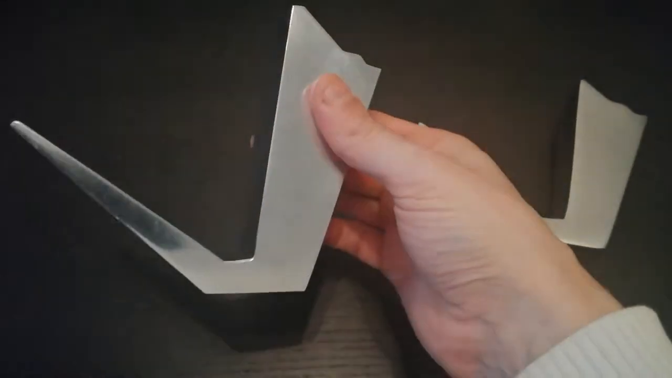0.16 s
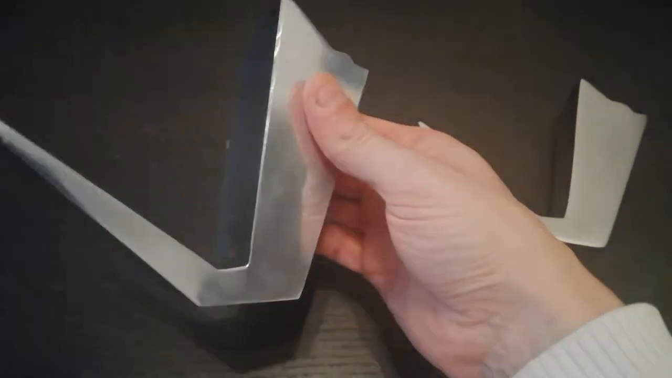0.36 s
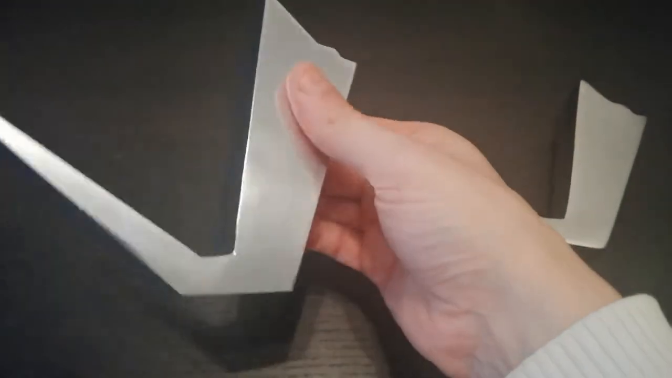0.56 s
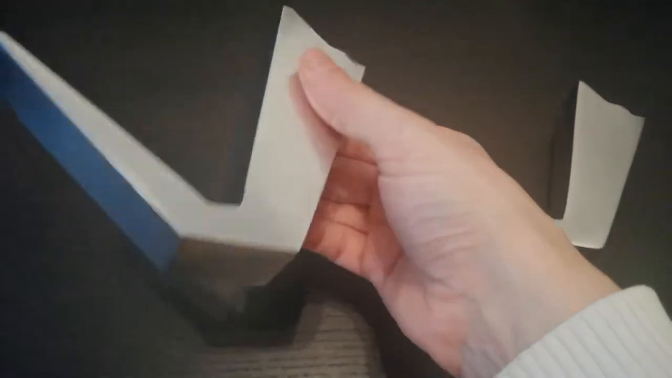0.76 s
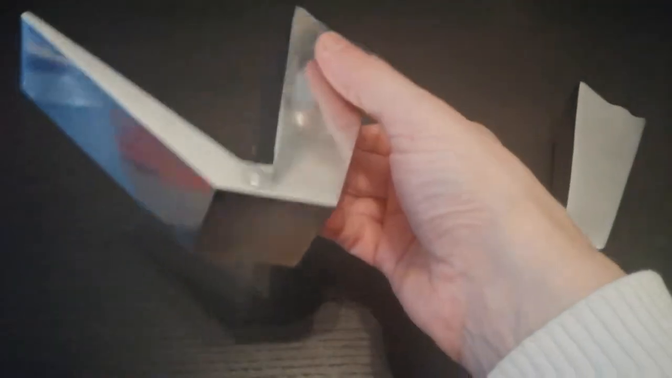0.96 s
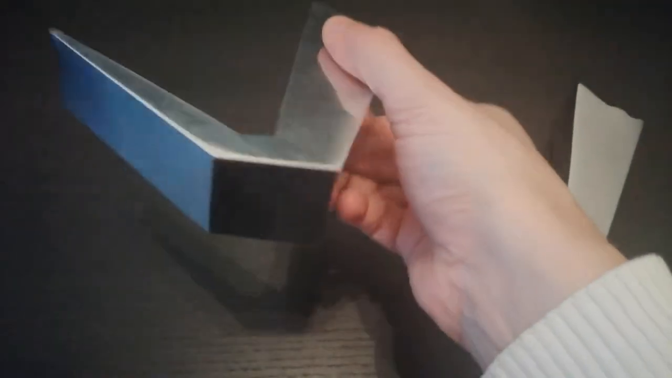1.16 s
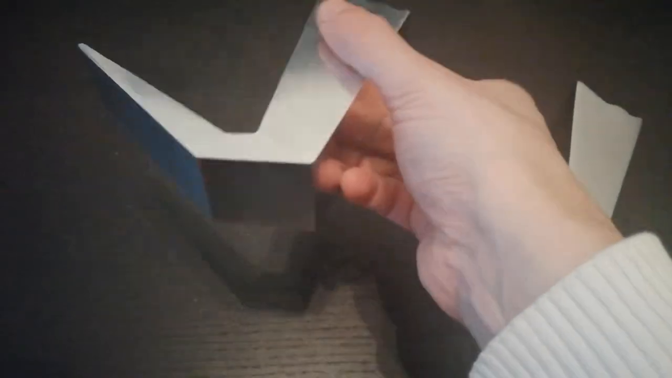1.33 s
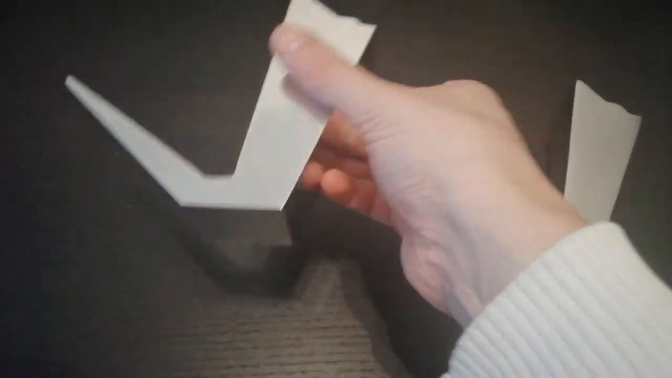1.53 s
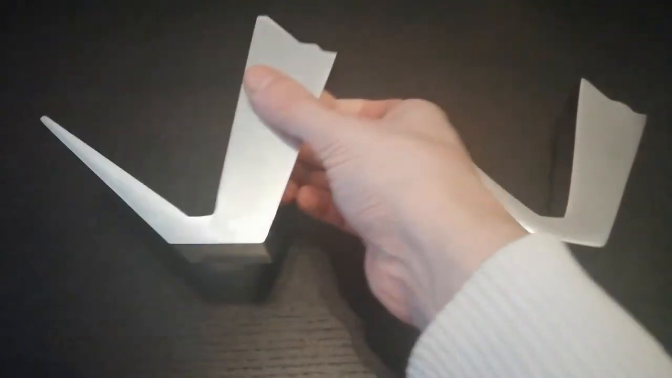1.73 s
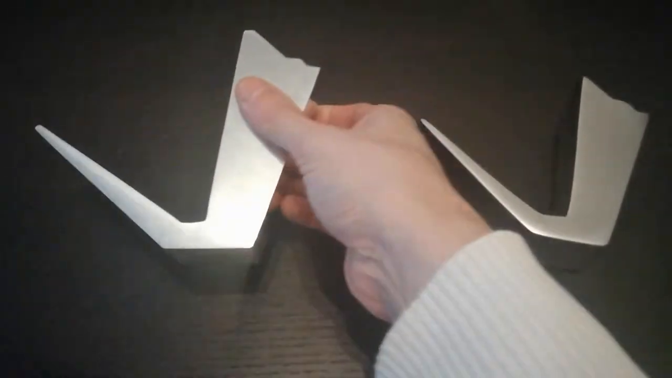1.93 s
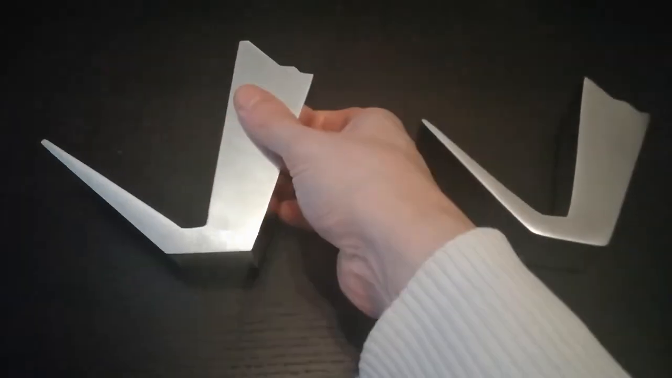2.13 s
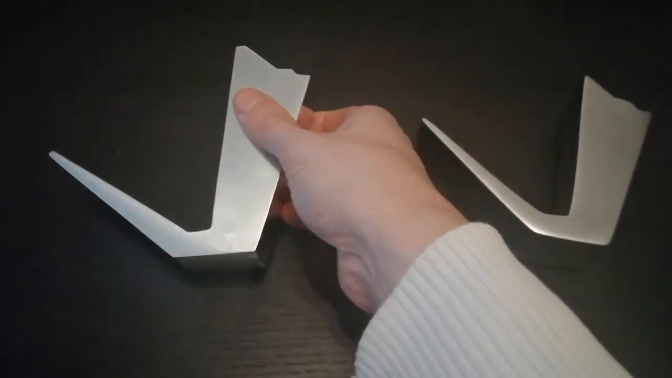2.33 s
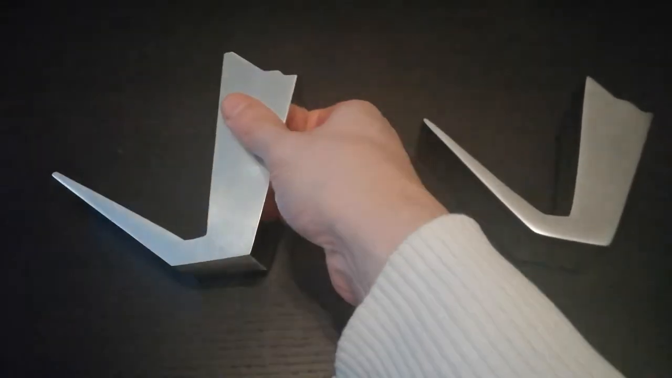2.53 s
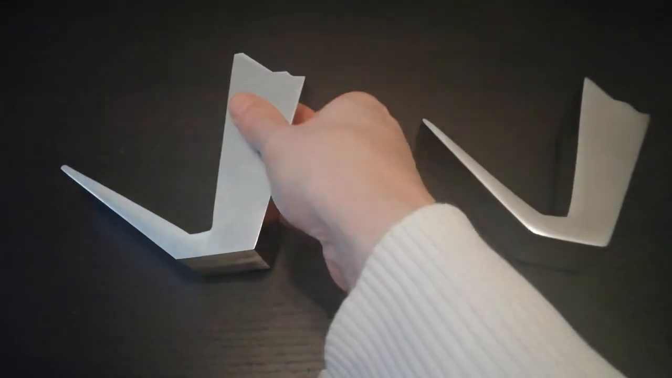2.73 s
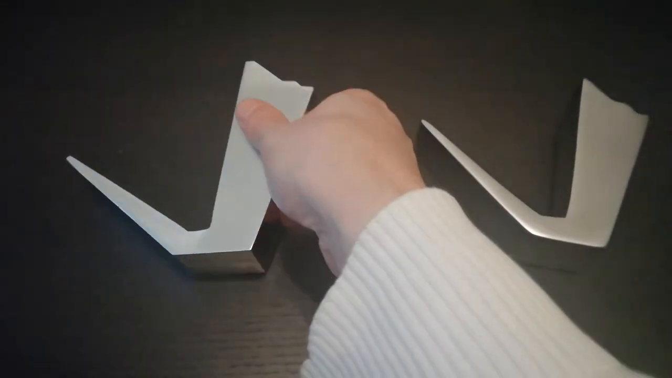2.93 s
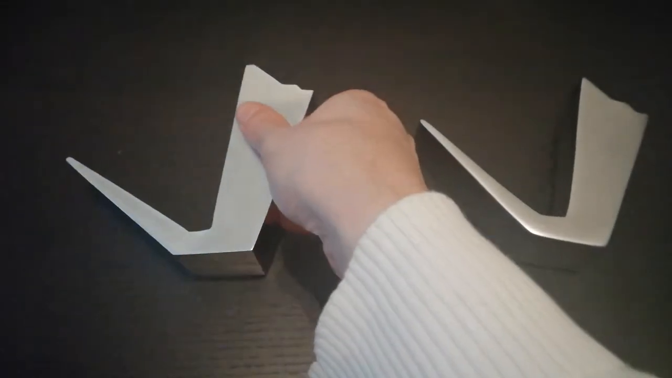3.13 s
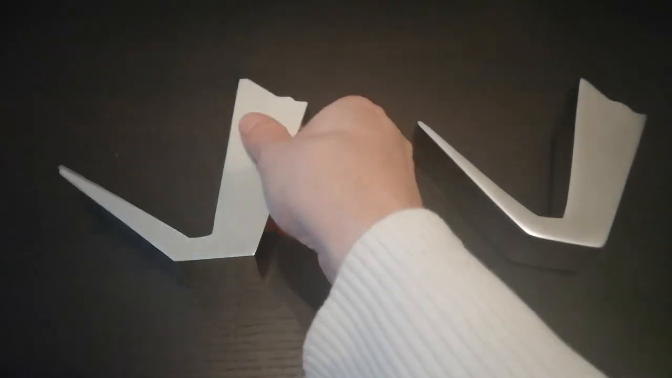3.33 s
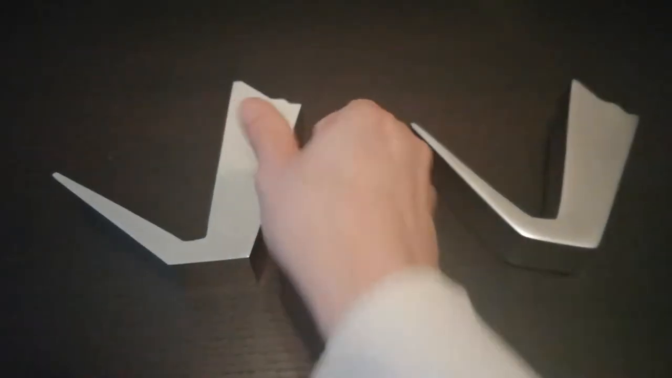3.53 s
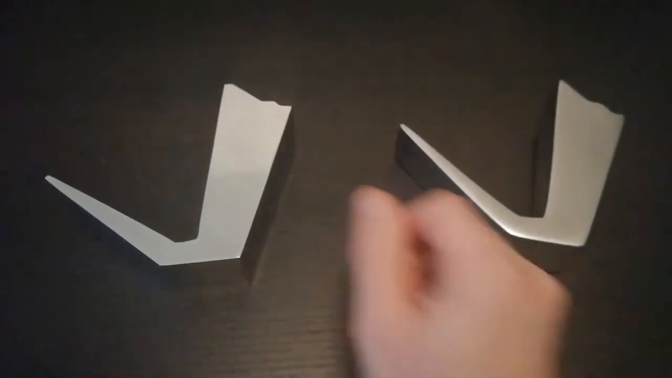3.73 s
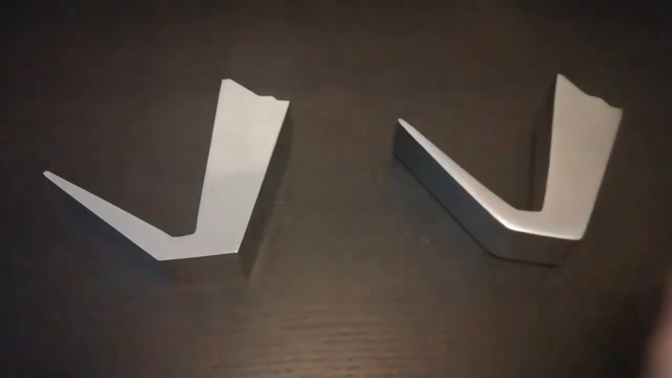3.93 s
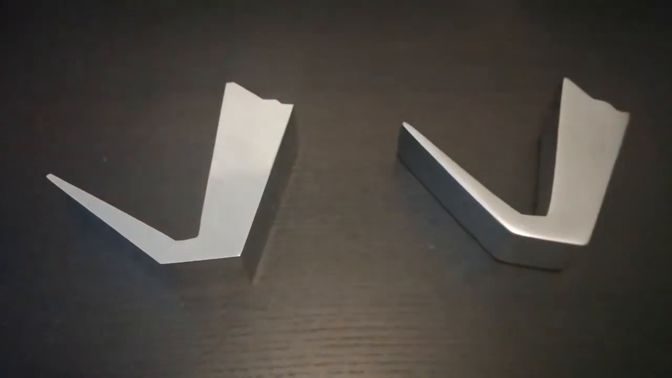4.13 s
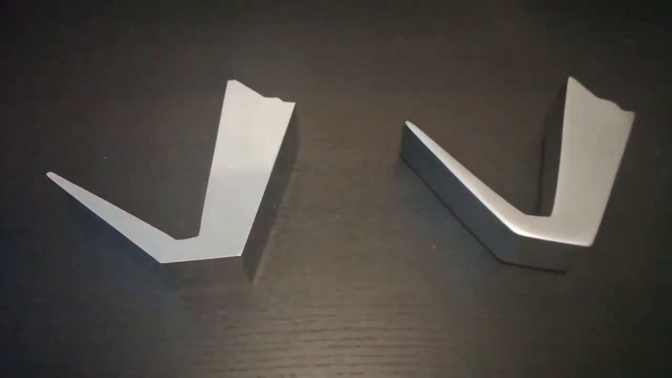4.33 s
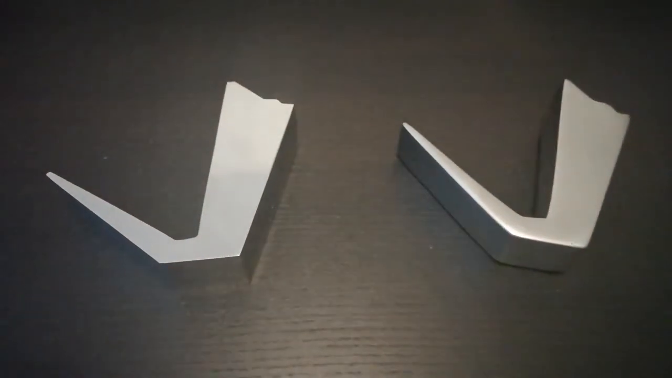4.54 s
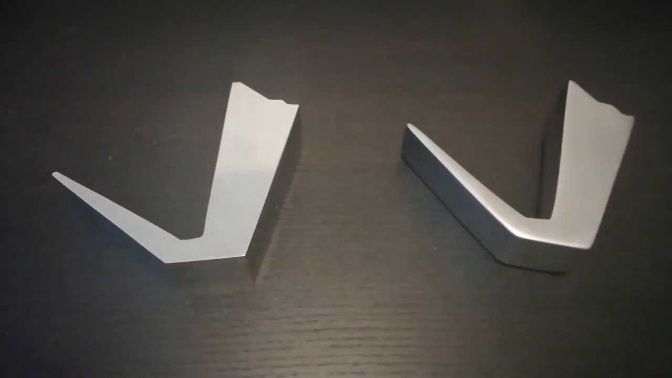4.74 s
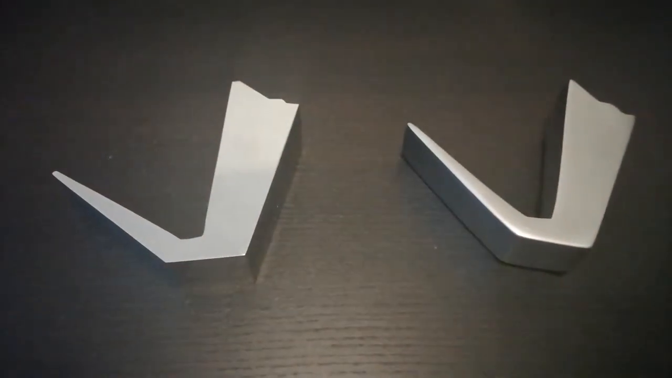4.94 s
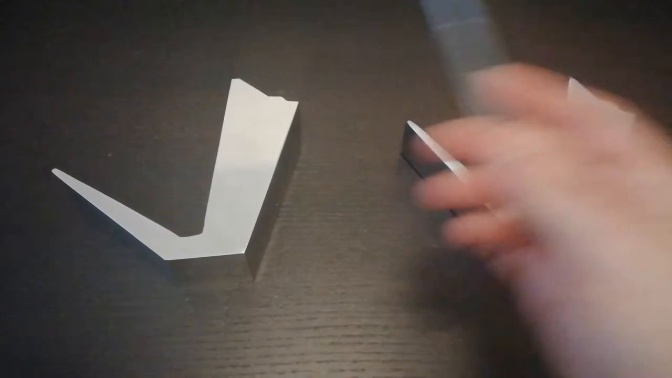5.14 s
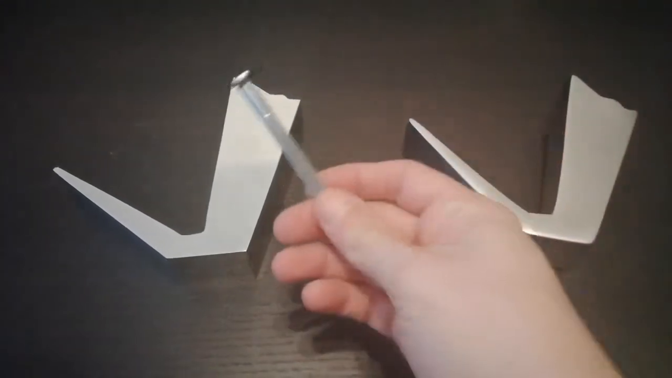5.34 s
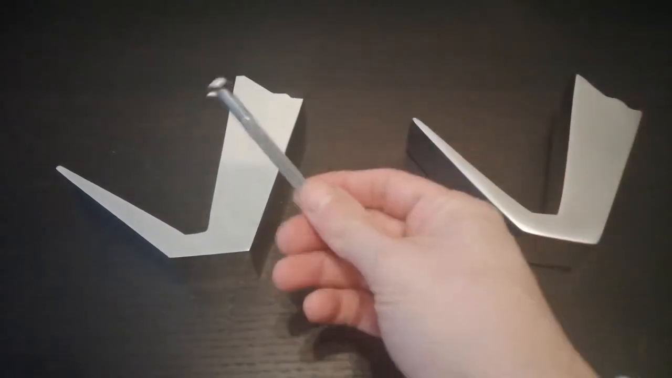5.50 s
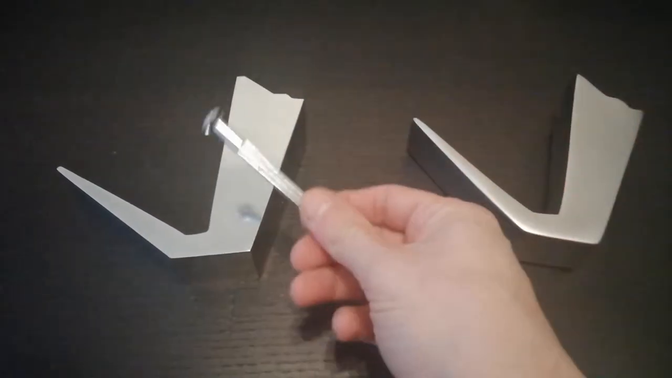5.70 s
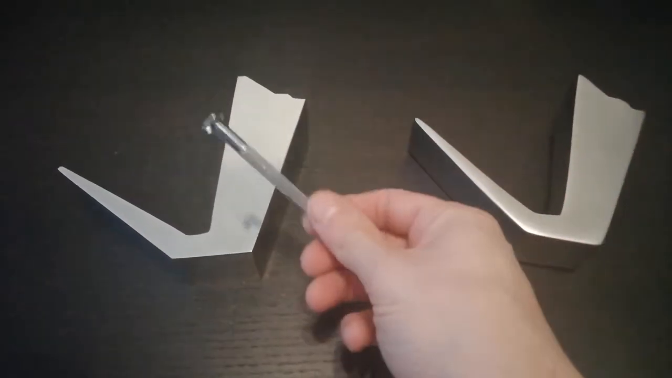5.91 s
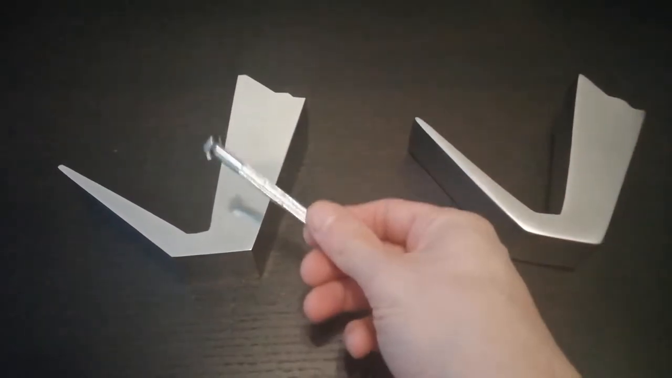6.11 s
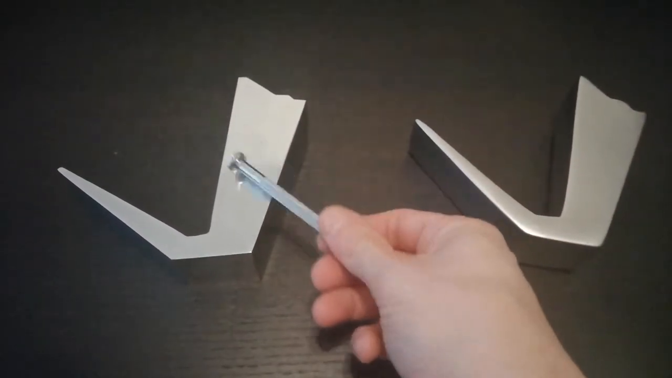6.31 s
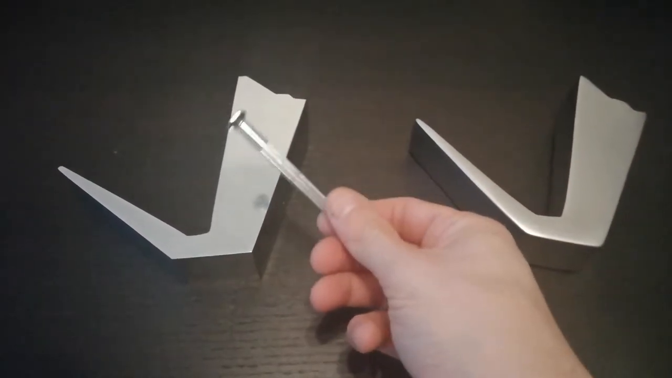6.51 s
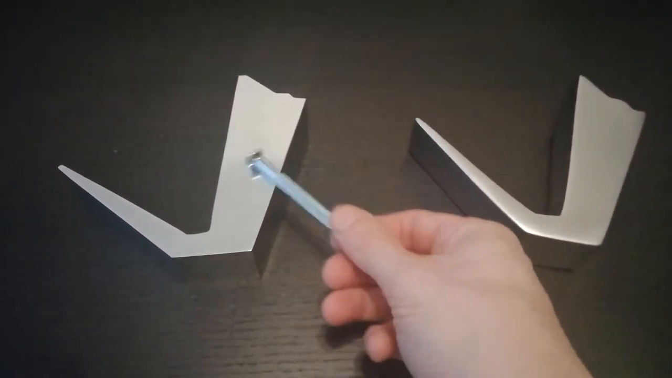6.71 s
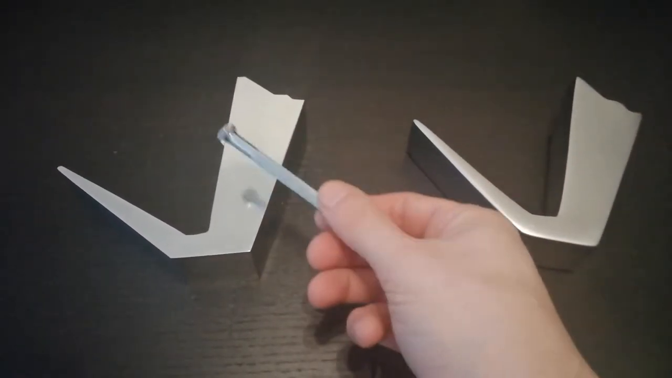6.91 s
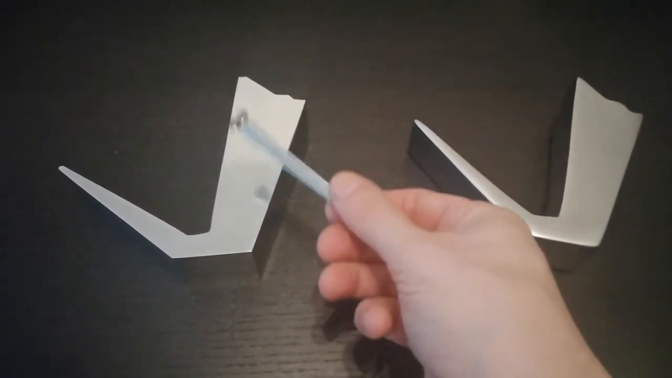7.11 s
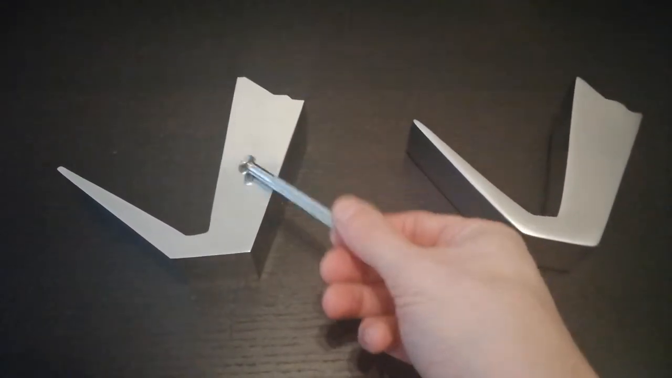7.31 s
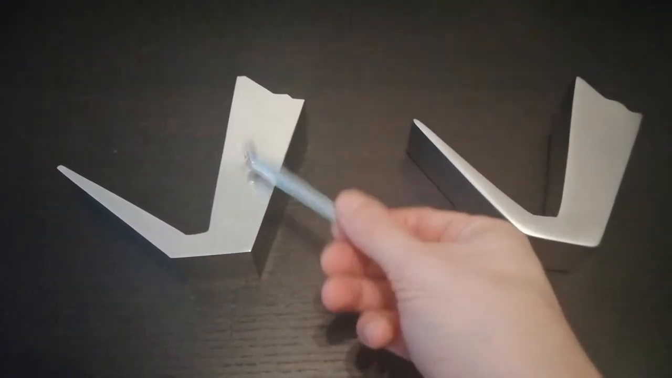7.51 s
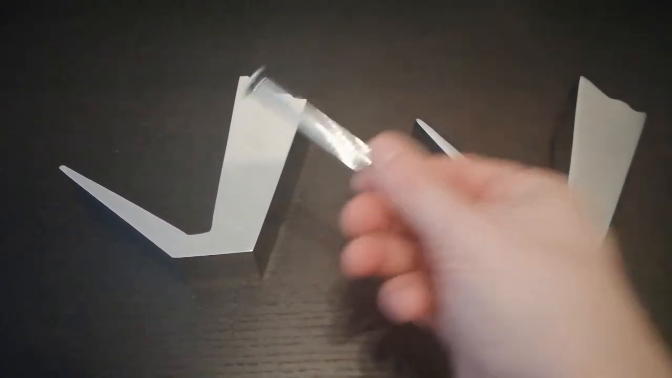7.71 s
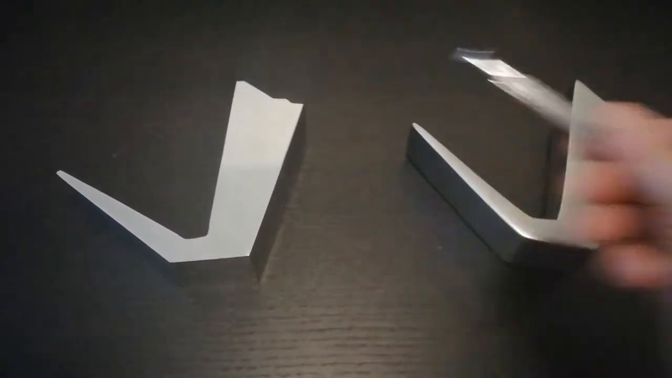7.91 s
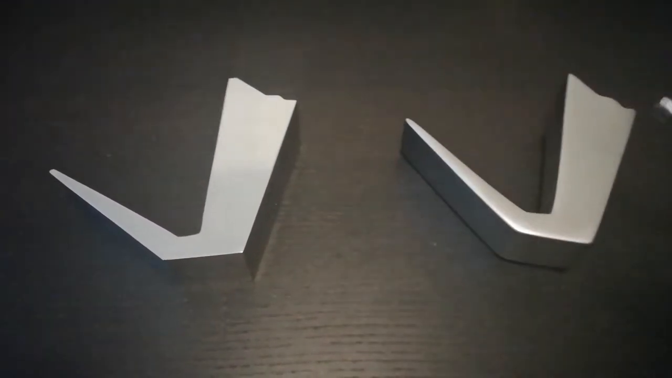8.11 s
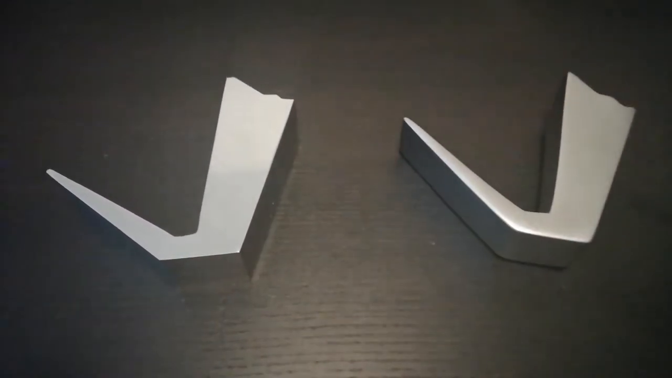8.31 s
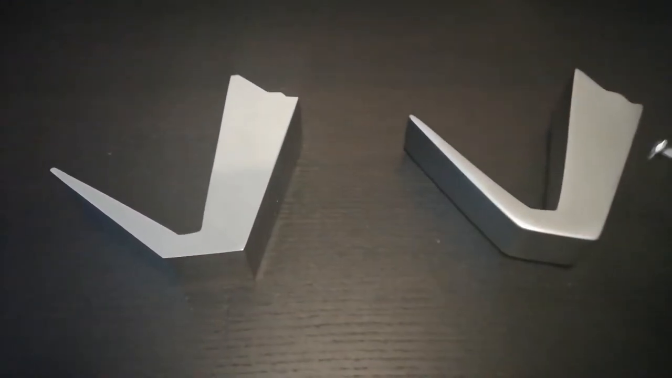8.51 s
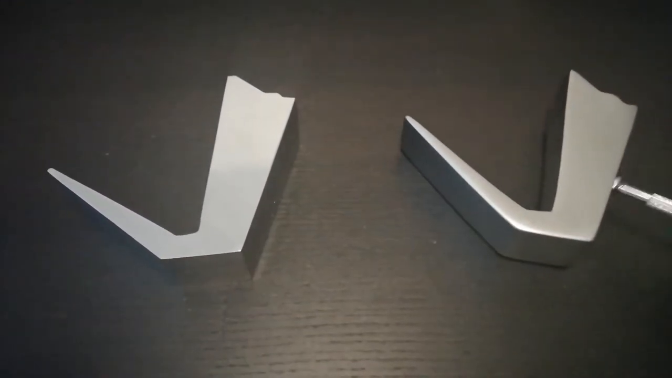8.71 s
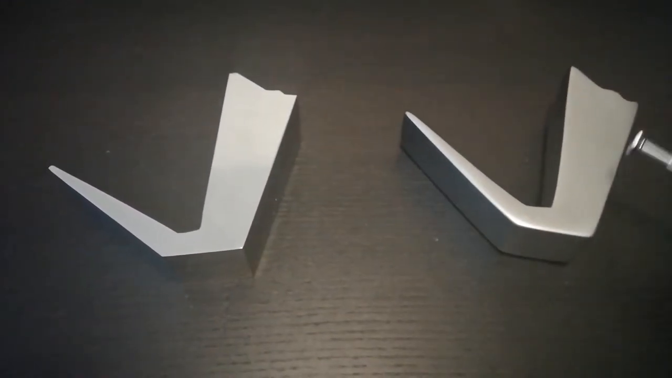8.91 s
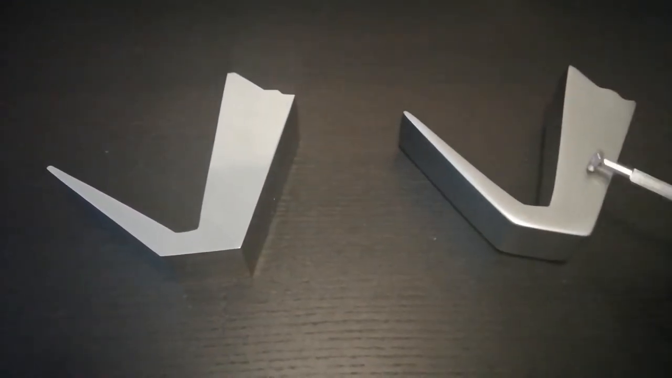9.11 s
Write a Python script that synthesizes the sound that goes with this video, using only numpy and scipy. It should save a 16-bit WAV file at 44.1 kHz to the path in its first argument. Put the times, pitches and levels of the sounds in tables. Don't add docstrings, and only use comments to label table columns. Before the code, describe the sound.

A small hard indoor room with faint low rumble and soft hiss, heard closely by a phone above a wooden table. It is nearly quiet, with a very faint sleeve swish around 0.7 s. At 2.5 s a heavy solid metal claw knocks the board with a low woody boom, chattering in quick weakening clacks until about 2.9 s. At 3.36-3.4 s it drops flat with a louder, hard clack and boom. Cloth brushes faintly near 4 s and rustles briefly at 4.6 s, with tiny high tinkles from a loose cap on a steel rod continuing irregularly to 6.6 s. The rod strikes the claw at about 6.36, 6.72, 7.04, 7.33 and 7.58 s: sharp, bright cracks with short, thin metallic rings, some with instant rebounds. Faint tinkles follow; the rod rattles lightly onto wood at 8.7-8.85 s, then makes a hard end tap at 9.13 s.

```python
import sys
import numpy as np
from scipy import signal
from scipy.fft import rfft, irfft
from scipy.io import wavfile
from scipy.ndimage import uniform_filter1d, minimum_filter1d

SR = 44100
rng = np.random.default_rng(int(sys.argv[2]) if len(sys.argv) > 2 else 0)


def linear_from_db(decibels):
    return 10 ** (np.asarray(decibels, float) / 20)


def to_wav(s):
    ch = np.atleast_2d(s).T
    pcm = np.round(np.clip(ch, -1, 1) * 32767)
    wavfile.write(sys.argv[1], SR, pcm.astype(np.int16))


N = 403515

# frequency in Hz, level in dB per Hz.
AIR = [(12, -43.5), (20, -5.5), (93, -5), (127, -12.5), (199, -7), (229, -13), (339, -16.5), (577, -23.5),
       (1040, -20.5), (1580, -21), (2030, -19.5), (4100, -29.5), (14900, -43), (16200, -52)]
# frequency in Hz, likeness 0-1.
AIR_ALIKE = [(60, .97), (300, .8), (1500, 0.02), (6000, 0)]
# frequency in Hz, t60 in seconds, level in dB.
ROOM = [(100, 0.57, -32), (300, 0.51, -24), (1200, 0.53, -22), (2950, 0.55, -22), (7000, 0.57, -30.5),
        (11300, 0.28, -27.5), (13000, 0.15, -28), (14500, 0.14, -40)]
# frequency in Hz, gain in dB.
PHONE = [(30, -18.5), (70, -10), (140, -1), (12500, -0.5), (14500, -10), (16500, -25.5)]
# frequency in Hz, level in dB per Hz.
LINGER = [(60, -90), (200, -3), (270, 0), (340, -3), (480, -40), (2000, -120)]

# start in seconds, hold in seconds, level in dB.
RUSTLE = [
    (4.62, 0.02, -59.5),
    (4.7, 0.01, -69.5),
]
# frequency in Hz, level in dB per Hz.
RUSTLE_COLOUR = [(180, -33.5), (300, -15), (697, -0.5), (920, -12.5), (969, -6.5), (2340, -8), (7000, -35),
                 (9100, -76), (15400, -120)]
# start in seconds, hold in seconds, level in dB.
SWISH = [
    (.68, .12, -79),
    (3.95, .24, -74.5),
    (4.89, .05, -72),
]
# frequency in Hz, level in dB per Hz.
SWISH_COLOUR = [(800, -27), (1500, -8), (2100, 0.5), (3000, -8), (6000, -14.5), (9000, -32)]

# start in seconds, high mode in dB, low mode re high in dB.
TINKLES = [(4.6125, -53, -25), (4.6862, -55, -27), (4.774, -50, -25), (4.8614, -70, 2.5),
           (5.0614, -63, 3.5), (5.0749, -51, -6), (5.1714, -70, 10), (5.1812, -57, 2.5), (5.242, -50, -11),
           (5.6047, -41, -8), (5.796, -72, -20), (5.8626, -49, -10), (5.963, -49.5, -14), (6.2587, -50, -9),
           (6.2747, -51.5, -13), (6.324, -54.5, -9.5), (6.6316, -49, -5), (7.5605, -53.5, -16),
           (7.8497, -56.5, -20), (8.0647, -57, -3), (8.0844, -68, -10), (8.7454, -48, -15),
           (8.774, -54, -9.5), (8.9498, -59, -13), (9.0468, -58, -7)]
# frequency in Hz, width in Hz, level in dB.
ROD_LOW = [(5320, 47, -4), (5730, 260, -3), (5216, 67, -7.5)]
# frequency in Hz, width in Hz, level in dB.
ROD_HIGH = [(11155, 120, 0), (10670, 210, -7.5), (11700, 280, -15.5)]

# start in seconds, shaft in dB, board re shaft in dB, steel end re shaft in dB.
ROD_DROPS = [
    (8.7167, -25.5, -30, -33),
    (8.7244, -28.5, -39, -16.5),
    (8.745, -32.5, -20, -34),
    (8.764, -34, -17, -26),
    (8.798, -37, -10.5, -42),
    (8.822, -37.5, -5, -45),
    (8.84, -34, -15, -50),
    (9.1339, -20, -14.5, -1.1),
]
# frequency in Hz, width in Hz, level in dB.
SHAFT = [(612, 33, -5.5), (1260, 40, -2.5), (2536, 76, 2), (3080, 46, -24), (3960, 83, -11)]
# frequency in Hz, width in Hz, level in dB.
TIP = [(4230, 200, 2.5), (2902, 120, -4), (5500, 300, 3)]

# start in seconds, push in dB,
# hard edge re push in dB, flat slap re edge in dB.
KNOCKS = [(2.4935, -24, -7.5, -9), (2.519, -33, -8, -15), (2.632, -34, 0.6, -26),
          (2.645, -35.5, -6.5, -26.5), (2.657, -43, -11, -28), (2.672, -39.5, -13, -18),
          (2.781, -53, -18, -31.5), (2.795, -47.5, -19.5, -20), (2.812, -50, -16, -36),
          (2.845, -48, -10.5, -30), (2.93, -52.5, -19.5, -33), (3.3612, -27.5, 5.5, -34),
          (3.3870, -18, 13, -15), (3.3948, -26.5, 7, 1.8)]
# frequency in Hz, width in Hz, level in dB.
BOARD = [(110, 60, -5.5), (170.14, 50, 5), (199, 15, -1.5), (274, 66, 1.5), (351, 30, -5), (407, 24, -3),
         (530, 50, -12), (620, 45, -6), (767, 130, -11.5)]
# frequency in Hz, width in Hz, level in dB.
LEGS = [(66.6, 14, 2)]
# frequency in Hz, width in Hz, level in dB.
EDGE = [(616, 63, -5.5), (727, 130, -5), (987, 130, 0), (1036, 71, -0.5), (1229, 91, 2.5), (1291, 140, 3),
        (1470, 120, -3), (1624, 75, -3.5), (1910, 110, 1.5), (2140, 150, -2.5), (2456, 170, 0.6),
        (2890, 130, -7.5), (3000, 750, -8.5), (4050, 700, -12)]
# frequency in Hz, width in Hz, level in dB.
SLAP = [(1110, 1100, -2)]

# start in seconds, blow in dB, spot along the claw 0-1, rebound delay in ms,
# rebound re blow in dB.
STRIKES = [
    (6.3566, -14, 0.35, 0, 0),
    (6.7196, -17.5, .157, 3.5, -5),
    (7.0399, -16, 0.46, 4.5, -4.5),
    (7.3256, -17, 0.52, 2, -2.5),
    (7.578, -13.5, 0.83, 3.5, -19),
]
# frequency in Hz, level in dB per Hz.
CRACK = [(300, -31.5), (750, -23), (1300, -9.5), (2600, -6.5), (3400, -13.5), (4250, -17), (5500, -13.5),
         (7000, -12), (11000, -0.5), (13500, -10.5), (16000, -20.5)]
# frequency in Hz, width in Hz, level in dB.
THUMP = [(172, 40, 0.4), (256, 16, -9), (322, 36, -5), (402, 26, -8.5)]
# frequency in Hz, width in Hz, level in dB.
ANSWER = [(621.2, 55, -2.5), (1144, 120, -0.5), (1560, 220, 4.5), (2492, 180, 1), (5520, 9.04, -2.5)]
# half waves along the claw, level at a crest in dB.
ANSWER_SHAPE = [(1.127, -26), (1.764, -18.5), (1.973, -20), (2.254, -17.5), (3.169, -22)]
CLAW_HZ = [1394, 3800, 4484, 5505, 8021, 8990, 11200, 12860]
# width in Hz, level when struck in dB, level when dropped in dB.
CLAW = [(6, -29.5, 9.5), (3.6, -26, -20), (11, -27.5, -5.5), (5.9, -21, -28), (7.9, -21.5, -25.5),
        (22, 5.5, -9.5), (17, 0.5, -20.5), (13, -2, -44)]
CLAW_WAVES = [.1, .1, .1, 3.19, .1, .1, 4.07, 1.7]

# frequency in Hz, left minus right in dB.
CLAW_SIDE = [(1400, -1), (5500, -5.5), (9000, -8.5), (11200, 8), (12900, 9)]
# frequency in Hz, left minus right in dB.
STRIKE_SIDE = [(100, -3), (400, 5.5), (700, 10.5), (1300, 3.5), (2400, 0.5), (5400, -4.5), (8000, 5),
               (11000, 9), (15000, 17)]
# frequency in Hz, left minus right in dB.
KNOCK_SIDE = [(60, 0), (110, 1.5), (200, -2.5), (380, 5.5), (700, 6.5), (1290, -2.5), (2380, -0.5),
              (4400, -3.0), (8120, -6.5), (15000, -2)]

SPOT_DB = 1.2


def along(table, hz, column=1):
    rows = np.array(table, float)
    return np.interp(np.log(np.maximum(hz, 1)), np.log(np.maximum(rows[:, 0], 1)), rows[:, column])


def colour(x, table):
    y = irfft(rfft(x) * linear_from_db(along(table, np.fft.rfftfreq(len(x), 1 / SR))), len(x))
    return y / np.sqrt(np.mean(y ** 2))


def pair(count, alike):
    mid, side = rfft(rng.standard_normal((2, count)))
    share = np.clip(along(alike, np.fft.rfftfreq(count, 1 / SR)), 0, 1)
    return np.sqrt(1 + share) * mid + np.array([[1], [-1]]) * np.sqrt(1 - share) * side


def ring(s, db, modes, spread_db):
    out = np.zeros(N)
    at = (np.asarray(s) * SR).astype(int)
    start, stop = at.min(), min(at.max() + SR, N)
    chance = rng.standard_normal((len(at), len(modes)))
    db = np.broadcast_to(db, (len(modes), len(at)))
    for k, (hz, width, mode_db) in enumerate(modes):
        blows = np.zeros(stop - start)
        blows[at - start] = (-1) ** k * linear_from_db(db[k] + mode_db + spread_db * chance[:, k])
        r = np.exp(-np.pi * max(width, 1) / SR)
        w = 2 * np.pi * hz / SR
        out[start:stop] += signal.lfilter([0, np.sin(w)], [1, -2 * r * np.cos(w), r * r], blows)
    return out


def crack(s, db, table, decay_s):
    blows = np.zeros(N)
    blows[(np.asarray(s) * SR).astype(int)] = linear_from_db(db)
    swell = signal.lfilter([1], [1, -np.exp(-1 / (decay_s * SR))], blows)
    return swell * colour(rng.standard_normal(N), table)


def crest(spot, waves):
    return 20 * np.log10(abs(np.cos(np.pi * spot * np.reshape(waves, (-1, 1)))) + .15)


def causal(db):
    quefrency = irfft(db * np.log(10) / 20, N)
    fold = (1 + np.sign(N / 2 - np.arange(N))) * np.r_[.5, np.ones(N - 1)]
    return np.exp(rfft(quefrency * fold))


def air():
    left, right = (colour(irfft(c, N), AIR) for c in pair(N, AIR_ALIKE))
    return linear_from_db(-68 - 0.3) * np.array([np.roll(left, shift=26), right])


def room(x):
    t = np.arange(SR) / SR
    noise = pair(SR, [(100, 1.0), (400, 0.5), (1500, .1), (8000, .02)])
    hz = np.fft.rfftfreq(SR, 1 / SR)
    echoes = 0
    for centre in 60 * 2 ** np.arange(0, 8.5, .5):
        band = np.maximum(1 - 2 * abs(np.log2(np.maximum(hz, 1) / centre)), 0)
        fade_db = along(ROOM, centre, column=2) - 60 * t / along(ROOM, centre)
        echoes = echoes + irfft(noise * band) * linear_from_db(fade_db)
    echoes = echoes * np.clip((t - .003) / 0.0021, 0, 1)
    return signal.fftconvolve(x[None], echoes)[:, :N]


def under_table():
    s, push, edge, _ = np.transpose(KNOCKS)
    return crack(s, push + edge - 56, LINGER, decay_s=.3)


def cloth(moves, rise_db_s, fall_db_s, table):
    t = np.arange(N) / SR
    noise = rng.standard_normal((2, N))
    grain = noise * linear_from_db(2.2 * np.repeat(rng.standard_normal(N // 200 + 1), 200)[:N])
    swell = 0
    for s, hold, db in moves:
        rise = rise_db_s * np.maximum(s - t, 0)
        fall = fall_db_s * np.maximum(t - s - hold, 0)
        swell = swell + linear_from_db(db + 2.0 - rise - fall)
    return np.array([colour(g, table) for g in grain]) * swell


def sleeve():
    rustle = cloth(RUSTLE, 218, 245, RUSTLE_COLOUR)
    return rustle + cloth(SWISH, 90, 78, SWISH_COLOUR)


def cap():
    s, db, low = np.transpose(TINKLES)
    high = ring(s, db - 3.5, ROD_HIGH, 1.4)
    deep = ring(s, db + low, ROD_LOW, 1.5)
    high = high + crack(s, db - 15, [(3500, -28.5), (6000, 1.0), (10500, 8), (15000, -14.5)], 0.00071)
    sides = np.array([[.5], [-.5]])
    return high * linear_from_db(14.5 * sides) + deep * linear_from_db(-7 * sides)


def rod_on_table():
    s, db, board, steel_db = np.transpose(ROD_DROPS)
    wood = ring(s, db + board - 4.0, BOARD, SPOT_DB) + ring(s, db - 14.5, SHAFT, SPOT_DB)
    tip_db = np.maximum(5 + 5.6 * steel_db, -37)
    steel = ring(s, db + steel_db + 3.5, ROD_HIGH, SPOT_DB) + ring(s, db + tip_db, TIP, SPOT_DB)
    hiss_colour = [(1500, 5), (5000, -1.0), (10000, 3.0), (15000, -7.0)]
    return wood + steel + crack(s, db - 5 + 0.42 * steel_db, hiss_colour, .004)


def claw(s, db, column):
    modes = [(hz, mode[0], mode[column]) for hz, mode in zip(CLAW_HZ, CLAW)]
    return ring(s, db, modes, SPOT_DB)


def claw_on_table():
    s, push, edge, slap = np.transpose(KNOCKS)
    snap = push + edge + slap
    dull = .55 * np.clip(push + edge + 22, -20, 0)
    tilt = np.outer(np.log2(np.transpose(EDGE)[0] / 1200), dull)
    clack = ring(s, push + edge - 1 + tilt, EDGE, SPOT_DB) + ring(s, snap + 13, SLAP, SPOT_DB)
    snap_colour = [(1500, -0.5), (4000, 1.5), (8000, -14.0), (11500, -19.0), (12500, -46.5)]
    clack = clack + crack(s, snap - 3, snap_colour, .003)
    boom = ring(s, push + 1.2, BOARD, SPOT_DB)
    shake = ring(s, np.minimum(12 + 1.6 * push, -24), LEGS, SPOT_DB)
    return boom + shake + clack, claw(s, -25 + .9 * snap, column=2)


def rod_on_claw():
    first, blow, spot, late_ms, again = np.transpose(STRIKES)
    real = np.ravel([late_ms >= 0, late_ms > 1], order="F")
    both = [first, first + late_ms / 1000], [blow, blow + again], [spot, spot], [late_ms, late_ms]
    s, db, where, dwell_ms = (np.ravel(v, order="F")[real] for v in both)
    rod = ring(s, db - 11 + crest(where, 3.17), ROD_LOW, SPOT_DB)
    rod = rod + ring(s, db + 2 + crest(where, 3.93), ROD_HIGH, SPOT_DB)
    foot = 0
    for (waves, top_db), mode in zip(ANSWER_SHAPE, ANSWER):
        foot = foot + ring(first, blow + top_db + crest(spot, waves), [mode], 0)
    thump = ring(s, db - 27 + 1.8 * dwell_ms, THUMP, SPOT_DB)
    contact = crack(s, db - 12, CRACK, 0.0044)
    return rod + foot + thump + contact, claw(s, db - 21 + crest(where, CLAW_WAVES), column=1)


def ports(x, side, lag_s):
    hz = np.fft.rfftfreq(N, 1 / SR)
    half = causal(along(side, hz) / 2) * np.exp(-1j * np.pi * hz * lag_s)
    return irfft(rfft(x) * np.array([half, 1 / half]), N)


def suppress(x, knee_db, slope, most_db):
    loud = -minimum_filter1d(-uniform_filter1d(np.mean(x ** 2, axis=0), size=400), size=400)
    under = np.clip(slope * (10 * np.log10(np.abs(loud) + 1e-14) - knee_db), most_db, 0)
    return x * linear_from_db(uniform_filter1d(under, size=300))


def duck(x, bright, loud, knee_db, most_db):
    less = []
    for v in (bright, loud):
        level = 10 * np.log10(np.abs(uniform_filter1d(v ** 2, size=900)) + 1e-14)
        less.append(linear_from_db(np.clip(knee_db - level, most_db, 0)) - 1)
    rumble = signal.sosfiltfilt(signal.butter(2, 80, fs=SR, output="sos"), x)
    top = signal.sosfiltfilt(signal.butter(8, 13200, "high", fs=SR, output="sos"), x)
    return x + rumble * less[0] + top * less[1]


def scene():
    knocks, dropped = claw_on_table()
    strikes, struck = rod_on_claw()
    drops, ticks = rod_on_table(), cap()
    near = ports(knocks, KNOCK_SIDE, -.0002) + ports(strikes, STRIKE_SIDE, 0)
    near = near + ports(drops, STRIKE_SIDE, -.0003) + ports(struck + dropped, CLAW_SIDE, -0.000084)
    dull_knocks = signal.sosfilt(signal.ellip(6, 1, 60, 11800, fs=SR, output="sos"), knocks)
    to_walls = linear_from_db(-12.5) * dull_knocks + linear_from_db(-9) * strikes + linear_from_db(-9.5) * (drops + struck + dropped)
    far = room(to_walls)
    phone = causal(along(PHONE, np.fft.rfftfreq(N, 1 / SR)))
    heard = suppress(irfft(rfft(near + far) * phone, N), -42.5, 0.91, -33)
    boom_band = signal.butter(2, [170, 380], "band", fs=SR, output="sos")
    heard = heard + linear_from_db(-20.5) * signal.sosfilt(boom_band, far)
    tinkle = ticks + linear_from_db(-16) * room(ticks.mean(axis=0))
    return heard + under_table() + tinkle + sleeve() + duck(air(), struck, heard[0], -63, -22.5)


def top_cut(x):
    return signal.sosfilt(signal.butter(12, 16310, fs=SR, output="sos"), x)


def record(dry):
    mix = np.tanh(0.89 * dry) / 0.73
    return top_cut(mix)


dry = scene()
out = record(dry)
to_wav(out)
```